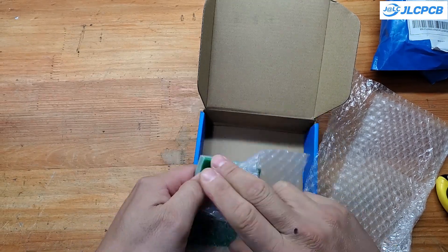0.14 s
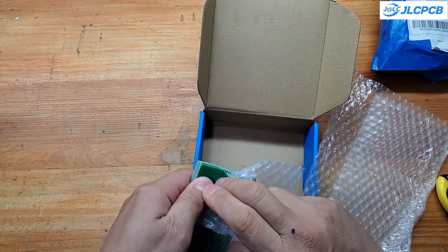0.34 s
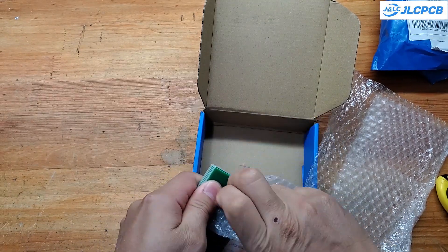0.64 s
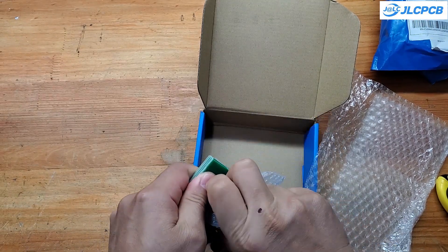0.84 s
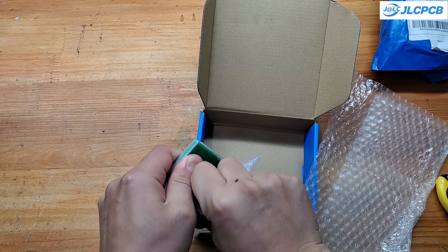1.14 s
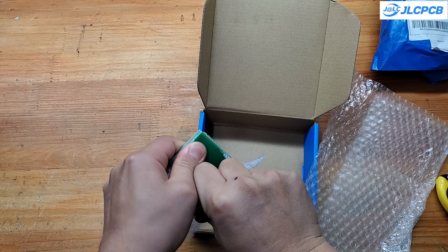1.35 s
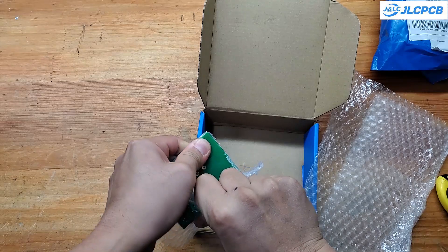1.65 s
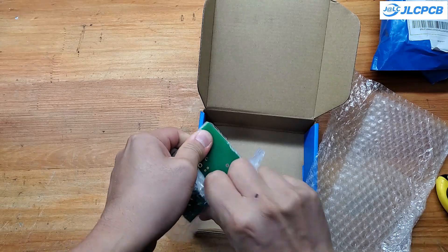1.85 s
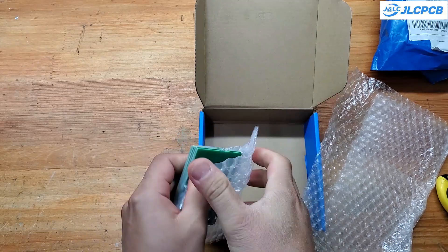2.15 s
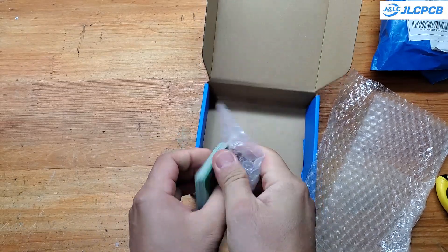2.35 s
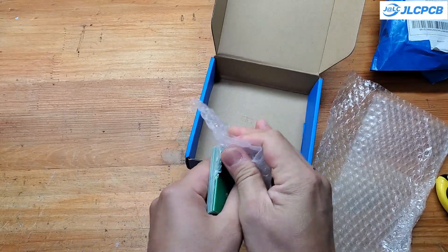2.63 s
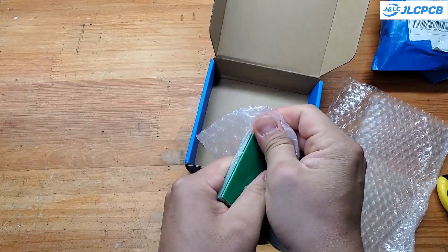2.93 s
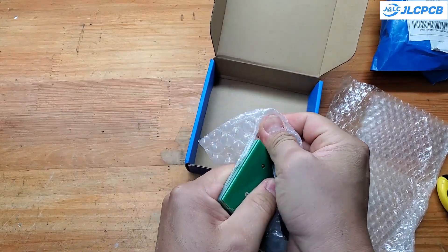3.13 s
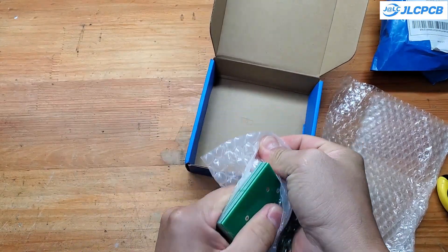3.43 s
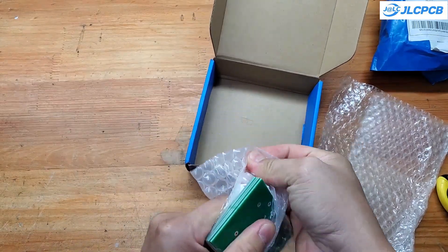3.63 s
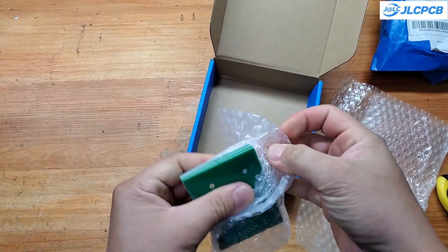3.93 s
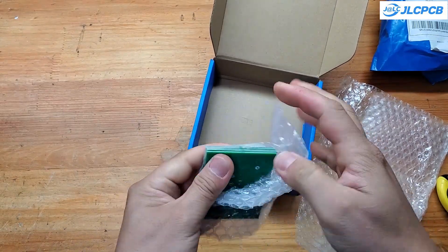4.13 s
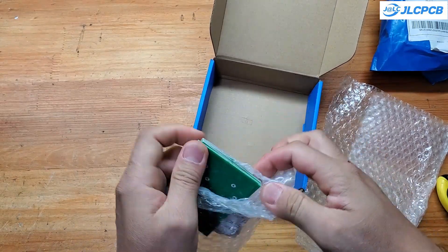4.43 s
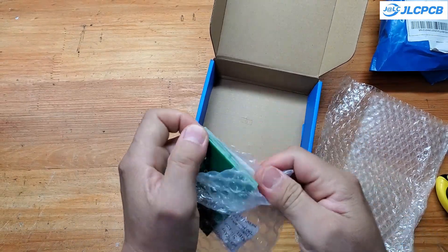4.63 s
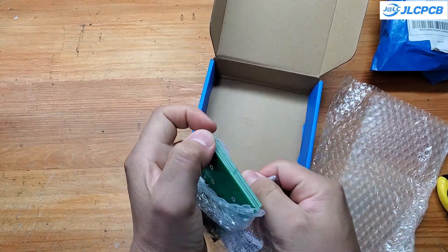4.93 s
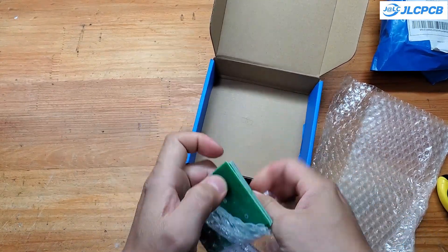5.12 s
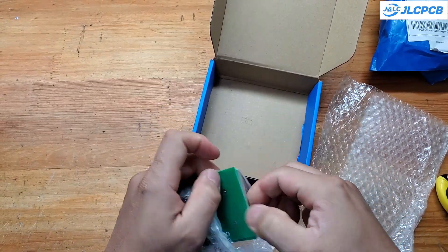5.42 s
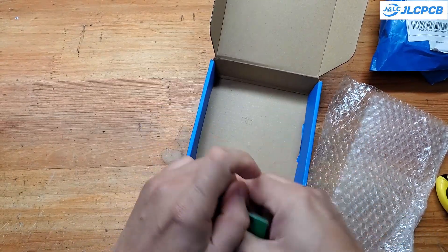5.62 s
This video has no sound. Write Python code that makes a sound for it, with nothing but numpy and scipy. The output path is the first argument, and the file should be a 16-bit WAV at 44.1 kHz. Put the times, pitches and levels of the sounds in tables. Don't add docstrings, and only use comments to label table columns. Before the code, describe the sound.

Hands unwrap bubble film from small boards, heard closely in stereo from above a table in a small, fairly dry room. A brief crinkle opens, then light ticks and sparse crackle until two hard, low-pitched snaps with dull knocks at about 0.87 and 1.05 s. Softer rustling follows, with tiny rough squeaks around 1.7 s and a crunchy jerk at 1.9 s. From 2 to 2.7 s the box is shoved, giving lumpy low rumble and dry cardboard scrape, strongest near 2.45. Bright snaps cluster from 2.7 to 3.1 s, then thinner crackle, and a sharp burst at 3.8 s. A hollow pop sounds at 4.1 s. Fine, uneven crinkling continues through 5.4 s, ending in a dense crunch with thuds near 5.65 s and a low rumble. Very faint dove coos at 0.45 and 3.5-3.9 s sit over low hum and distant engine drone.

```python
import sys
import numpy as np
from scipy import signal
from scipy.fft import rfft, irfft
from scipy.io import wavfile
from scipy.ndimage import uniform_filter1d

SR = 44100
rng = np.random.default_rng(int(sys.argv[2]) if len(sys.argv) > 2 else 0)


def bounce(signal):
    frames = np.transpose(np.atleast_2d(signal))
    limited = np.clip(frames, -1, 1)
    pcm = np.round(limited * 32767).astype(np.int16)
    wavfile.write(sys.argv[1], SR, pcm)


def invert_db(level):
    return 10 ** (np.asarray(level, dtype=float) / 20)


N = 254456

# (frequency [Hz], t60 [s])
NEAR_T60 = [(250, 0.055), (1200, 0.026), (4000, 0.042), (12000, 0.022)]
# (frequency [Hz], t60 [s])
ROOM_T60 = [(250, 0.29), (1200, 0.29), (4000, 0.25), (12000, 0.16)]
NEAR_DB, ROOM_DB = -6, -11.5


def crinkle():
    # (frequency [Hz], level [dB per Hz])
    film_colour = [(290, -55), (500, -19.5), (775, -17.5), (847, -21.5), (1430, -20), (2540, -8.5),
                   (3350, -3.5), (5670, -4.5), (7710, -17.5), (9740, -10), (15300, -15), (16500, -27)]
    # (peak time [s], length [s], crinkle [dB], dull creases [dB re crinkle], fine fizz [dB re crinkle])
    jerks = [(0.0, 0.16, -43, 4, -8.5), (0.235, 0.14, -53, 0, -11), (0.31, 0.26, -63, -17, -5),
             (0.47, 0.24, -55, 5, -13.5), (0.62, 1, -55.5, -8, -16.5), (1.05, 0.46, -47, 3, -9),
             (1.44, 0.18, -57.5, 1, -6.5), (1.58, 0.28, -52.5, 1, -0.5), (1.93, 0.22, -37, 5, -7.5),
             (2.44, 0.29, -45.5, 9, -8), (2.73, 0.34, -45, -20, -24), (2.81, 0.5, -41.5, -0.5, -9.5),
             (3.1, 0.16, -47.5, 5.5, -7.5), (3.4, 1, -55, 0, -10), (4.49, 0.19, -50.5, -1.5, -9),
             (4.62, 0.42, -52.5, 0, -10), (5.45, 0.33, -65, 5, -6), (5.548, 0.13, -53.5, 9.5, -5),
             (5.638, 0.16, -40.5, 7.5, -9), (5.678, 0.1, -36, 8, -11.5)]
    # (peak time [s], length [s], crinkle [dB], dull creases [dB re crinkle], fine fizz [dB re crinkle])
    pulls = [(0.77, 0.83, -60, 4, -18), (0.87, 0.25, -41.5, 0.5, -10), (1.72, 0.61, -52.5, 6, -12),
             (2.19, 0.22, -48, 7.5, -10), (2.34, 0.46, -48, 5, -9.5), (2.97, 0.17, -43.5, -0.5, -5.5),
             (3.33, 0.31, -47, 0, -12), (3.73, 0.38, -53.5, -10, -7.5), (3.82, 0.14, -34.5, 0, -7.5),
             (3.97, 0.61, -58.5, -6, -6.5), (4.08, 0.15, -47, -6, -8), (4.18, 0.21, -46, -2, -7),
             (4.39, 0.41, -52, 1, -9), (4.92, 0.42, -52.5, -2.5, -10), (5.19, 0.32, -52, 4, -6.5),
             (5.27, 0.19, -48, -2, -7), (5.39, 0.18, -56, 3.5, -9)]

    film = space(coloured(buckling_film() * invert_db([[1.2], [-1.2]]), film_colour))
    film = levelled(film, size=2500)
    quiet = hush()
    folds = levelled(band(film, 653, 1822), size=900) * quiet
    film = film * quiet

    crisp, dull, fine = np.sqrt(effort(jerks, rise=0.32) + effort(pulls, rise=0.68))
    lift, dull_lift = flurries()
    body = crisp * lift * invert_db(3.5) * evened(band(film, 2660, 6780))
    creases = dull * dull_lift * invert_db(-6.5) * folds
    fizz = fine * lift * invert_db(7.0) * evened(band(film, 7950, 22000))
    return body + creases + fizz


def buckling_film():
    buckles_per_s, spread_db, clump_db, patches = 2000, 4.2, 3, 24
    clump = evened(uniform_filter1d(uniform_filter1d(rng.standard_normal(N), 500), 300))
    strikes = rng.random(N) < buckles_per_s / SR * invert_db(clump_db * clump)
    strength = invert_db(spread_db * np.minimum(rng.exponential(1, N), 3))
    size = strikes * strength * rng.choice([-1, 1], N)
    patch = rng.integers(0, patches, N)
    t = np.arange(300) / SR
    film = np.zeros((2, N))
    for k, hz in enumerate(np.geomspace(900, 13000, patches)):
        rasp = rng.standard_normal(len(t)) * np.exp(-t / 0.00058)
        grain = evened(ring(hz, 3.4, t)) + 1.76 * evened(rasp)
        even = np.sign(size) * abs(size) ** min(hz / 3500, 1)
        one = signal.oaconvolve(even * (patch == k), grain)[:N]
        film += [one, np.roll(one, rng.integers(-4, 7))]
    return film


def flurries():
    # (time [s], length [s], crinkle lift [dB], dull creases lift [dB])
    bursts = [(0.075, 0.013, 12, 12), (0.233, 0.071, 0, 9), (0.451, 0.021, 11, -1), (0.555, 0.028, 19, 25),
              (0.613, 0.02, -3, 13), (0.837, 0.029, -5, 10), (0.863, 0.048, 12, 10), (1.048, 0.045, 25, 18),
              (1.245, 0.023, 20, 8), (1.338, 0.031, 21, 8), (1.426, 0.018, 15, 8.5), (1.526, 0.013, 11, 14),
              (1.759, 0.022, 13, 8), (1.823, 0.02, 13, 11), (1.878, 0.055, 11, 13), (2.054, 0.039, -3, 27),
              (2.114, 0.024, 15, 15), (2.182, 0.043, 8, -3), (2.27, 0.06, 1.5, 5.0), (2.413, 0.024, 20, 23),
              (2.607, 0.04, 6.5, -7), (2.71, 0.02, 34, 12.0), (2.785, 0.019, 8, 10), (2.984, 0.04, 8.5, 8),
              (3.076, 0.048, 9, 14), (3.198, 0.013, 18, 12), (3.319, 0.01, 26, 11), (3.537, 0.018, 7, 17),
              (3.58, 0.014, -7, 13), (3.639, 0.021, 13, 24), (3.695, 0.018, 8, 7.5),
              (3.818, 0.033, -11, 17), (4.002, 0.02, 13, 6.0), (4.097, 0.024, 9, 14),
              (4.151, 0.052, 8, 8.5), (4.341, 0.016, 10, 17), (4.404, 0.019, 10, 30), (4.496, 0.033, 3, -6),
              (4.622, 0.043, 10, -3), (4.77, 0.029, 0, 1), (4.927, 0.058, 2, 23), (4.983, 0.046, 7, 21),
              (5.077, 0.023, 5.0, 3), (5.11, 0.013, 8, 8), (5.195, 0.04, 8, 18), (5.27, 0.07, -3, 2),
              (5.38, 0.052, 5, 19), (5.56, 0.042, -3, 20), (5.637, 0.012, 15, 22), (5.67, 0.02, 20, 17)]
    share = 0.43
    t = np.arange(0, N + 64, 64) / SR
    lift_db = 0
    for s, length_s, *db in bursts:
        shape = np.exp(-(2 * (t - s) / max(length_s, .005)) ** 2)
        lift_db = lift_db + np.array(db)[:, None] * shape
    return np.repeat(invert_db(share * lift_db), 64, axis=1)[:, :N]


def hush():
    tension = np.zeros(N)
    for s, db, *_ in every_snap():
        build_up = np.linspace(0, max(db + 33, 0), round(0.02 * SR))
        add(tension, max(round((s - .022) * SR), 0), build_up)
    return invert_db(-.45 * tension)


def snaps():
    out = np.zeros((2, N))
    t = np.arange(2200) / SR
    rows = every_snap()
    chance = rng.random((len(rows), 3))
    noises = rng.standard_normal((len(rows), 3, len(t)))
    draws = rng.random((len(rows), len(t)))
    grit = peaked(band(1. * (t == 0), 2010, 5850))
    for (s, db, hz, tick_db, tear_ms), (a, b, c), noise, u in zip(rows, chance, noises, draws):
        crack = peaked(band(np.exp(-t / .00003), 0.5 * hz, min(1.68 * hz, 8000)))
        spray = (t == 0) + 0.46 * noise[:2] * np.exp(-t / 0.00017)
        tick = peaked(band(spray, 7000, 20400))
        buckle = 1.16 * ring(hz, 1.01 + .5 * a, t) + 0.55 * crack + 0.021 * grit
        buckle = buckle + invert_db(tick_db + 5.5) * tick

        fade = np.exp(-1000 * t / np.clip(tear_ms, .3, 30))
        slips = np.clip(noise[2], -1.6, 1.6) * (u < 2000 / SR) * fade
        slip = (0.059 * crack + grit + invert_db(tick_db + 13.0) * tick)[:, :200]
        tear = signal.oaconvolve(slips[None], slip)[:, :len(t)]
        sound = invert_db(db + 5.5) * (buckle + 0.37 * tear)
        place(out, s + 0.001137, sound, pan_db=1.7 + 3.0 * b, lead=round(3 * c))
    return out


def every_snap():
    # (time [s], peak level [dB], ring [Hz], bright tick [dB re peak], tear length [ms])
    cracks = [(0.839, -27.5, 2640, -29, 3.9), (0.87, -14, 1405, -12, 5.5), (1.0451, -11.5, 1350, -7, 5.8),
              (1.9004, -28, 4330, -2, 5.3), (1.929, -25.5, 4600, -16, 3.5), (2.39, -24.5, 3620, -26, 4.2),
              (2.7044, -18, 4030, -19, 4.5), (2.8828, -24.5, 3600, -7, 5.9), (3.0792, -17, 3190, -42, 1.9),
              (3.1123, -30, 1780, -20, 3.1), (3.319, -28.5, 1730, -4, 6), (3.5787, -29.5, 5200, -23, 1.1),
              (3.687, -24.5, 5500, -15, 3.7), (3.8011, -17.5, 2800, -16, 3.9), (3.821, -15, 6000, -9, 0.64),
              (3.8347, -15, 6200, 0.5, 0.72), (3.9927, -34, 4300, 0, 0.51), (4.151, -24.5, 3180, -12, 4),
              (4.8945, -25, 4630, -9.5, 2.2), (5.5543, -24.5, 1980, -17, 2.5),
              (5.6261, -30.5, 1710, -7, 3.8), (5.6345, -25.5, 1160, -17, 10), (5.67, -18.5, 3800, -5.5, 9),
              (5.6777, -19, 3000, -12, 3.4)]
    # (time [s], peak level [dB], ring [Hz], bright tick [dB re peak])
    crisp = [(0.4431, -41, 3660, 3.5), (0.5012, -36.5, 3200, -3), (0.5567, -38, 1820, -0.5),
             (0.909, -27.5, 4940, -8), (0.9249, -30.5, 3480, 1.5), (1.143, -34.5, 2940, -2),
             (1.2345, -35, 3880, -7), (1.423, -41, 2220, 1.5), (1.5214, -42, 3200, -5),
             (2.0244, -38, 1040, -8), (2.7594, -33, 3480, -3), (2.8864, -25.5, 3600, 5),
             (3.2853, -37, 2770, -9), (3.454, -32, 5800, -7.5), (3.633, -32, 4660, -15),
             (3.76, -40, 1860, 1), (3.9675, -41, 4700, 1), (3.93, -39.5, 3030, -2),
             (4.003, -25.5, 5900, -8), (4.055, -35, 3370, -2), (4.3038, -39.5, 3360, -11),
             (4.335, -38, 5690, -6), (4.3555, -35.5, 2470, -9), (4.4867, -41, 2470, -1),
             (4.5985, -41.5, 3860, -1), (4.659, -30.5, 5560, -11.5), (4.7617, -36.5, 4530, -8.5),
             (4.8295, -40.5, 5100, -2), (4.976, -38.5, 2940, -6), (5.1054, -29, 5500, -6)]
    # (time [s], peak level [dB], ring [Hz])
    muffled = [(0.0717, -35.5, 2720), (0.5438, -34.5, 3900), (0.8103, -39, 2260), (1.025, -32.5, 1220),
               (1.2037, -36.5, 3740), (1.683, -34, 3640), (1.8107, -37, 4400), (1.869, -35, 3430),
               (2.1085, -37.5, 1370), (2.172, -32.5, 4430), (2.253, -40, 3660), (2.28, -32.5, 3800),
               (2.554, -38.5, 2150), (2.592, -37.5, 2920), (2.743, -32, 2820), (2.9482, -36, 3940),
               (3.19, -30, 3180), (3.237, -40, 1500), (3.251, -34.5, 4300), (3.358, -26.5, 5300),
               (3.401, -33, 3520), (3.738, -40, 2960), (4.3971, -28, 5140), (4.932, -34.5, 1980),
               (4.135, -36.5, 5800), (5.1674, -36, 2180), (5.195, -33, 2230), (5.2457, -33, 5330),
               (5.5303, -36.5, 1390), (5.5419, -29.5, 1610)]
    # (time [s], peak level [dB], ring [Hz], bright tick [dB re peak])
    faint = [(0.2184, -41, 3420, -10), (0.3185, -38, 4000, 6), (0.41, -35.5, 3360, -4),
             (0.4618, -31.5, 3260, -2), (0.4898, -42, 3420, -8), (0.6115, -45, 3240, -8),
             (0.657, -39, 5290, -5), (0.6707, -30, 3260, -8), (0.7335, -30, 3250, -5),
             (0.7868, -32.5, 2290, 2), (1.0141, -41, 1140, 5), (1.408, -45, 2130, 3),
             (1.4513, -34.5, 3200, -6), (1.559, -30, 6450, 5), (1.5753, -43, 3180, -3),
             (1.604, -30, 4200, -8), (2.188, -30, 3400, -12), (2.2004, -24, 5040, -12),
             (2.322, -33, 2730, 1), (2.353, -35, 3920, -10), (2.4448, -36, 2780, -8),
             (2.5444, -38, 1890, -4), (2.6162, -32.5, 2670, -3), (2.6471, -35, 2790, -2),
             (2.7778, -19, 3420, -12), (2.869, -24, 3350, 5), (2.8939, -29, 3440, -6),
             (2.923, -19.5, 4660, -6), (2.9667, -25, 4270, -8), (3.0205, -37, 2120, -12),
             (3.1282, -25, 4890, -6.5), (3.2191, -32, 3420, -8), (3.2993, -30.5, 1720, -10),
             (3.3862, -38, 3020, -11), (3.486, -36, 3270, -3), (3.5342, -35, 3160, -8),
             (3.6939, -21.5, 3770, -7), (3.9125, -32.5, 3050, 4), (4.1127, -42.5, 3203, -1),
             (4.4682, -32, 3150, -20), (4.5817, -30, 6060, -7), (4.7393, -31, 4330, -5),
             (4.787, -38, 4750, -11), (4.8668, -33, 4420, -6), (5.002, -32, 3580, -8),
             (5.0786, -36, 1960, -14), (5.447, -52, 2140, -3)]
    crisp_tear_ms, muffled_tear_ms, faint_tear_ms = 2.6, 5.6, 1.3
    muffled_tick_db, faint_db = -27, -8
    return (list(cracks)
            + [(*row, crisp_tear_ms) for row in crisp]
            + [(*row, muffled_tick_db, muffled_tear_ms) for row in muffled]
            + [(s, db + faint_db, hz, tick_db, faint_tear_ms) for s, db, hz, tick_db in faint])


def squeaks():
    # (time [s], pitch [Hz], level [dB])
    whistles = [
        [(1.635, 720, -63), (1.655, 997, -56), (1.685, 1084, -48)],
        [(1.685, 1150, -44), (1.705, 1600, -64), (1.735, 1745, -71)],
        [(1.7, 773, -63), (1.737, 870, -57), (1.78, 780, -71)],
        [(1.735, 1102, -60), (1.75, 1507, -61), (1.775, 1255, -55)],
    ]
    return glides(whistles, waver=0.0584) * invert_db([[1.5], [-1.5]])


def knocks():
    # (time [s], peak level [dB], pitch [Hz], decay [cycles])
    dull_knocks = [(0.873, -23.5, 352, 0.54), (1.043, -26, 393, 0.75), (1.954, -33, 366, 1.1),
                   (2.413, -37.5, 228, 2), (2.922, -45, 231, 2.6), (3.82, -52.5, 195, 1.6),
                   (4.077, -47.5, 440, 1.6), (4.333, -48.5, 462, 1.5), (4.395, -42, 403, 1.16),
                   (4.915, -52, 368, 1.4), (5.194, -32, 396, 0.35), (5.252, -35.5, 620, 0.51),
                   (5.554, -31, 446, 0.79), (5.624, -27.5, 370, 0.83), (5.677, -20.5, 285, 0.41)]
    # (time [s], peak level [dB], pitch [Hz], decay [cycles])
    pockets = [
        (1.506, -50, 755, 3.6),
        (3.4, -30.5, 1000, 1.03),
        (2.1, -33, 950, 2),
        (4.1, -19, 1200, 2.3),
        (2, -31.5, 1240, 1.9),
        (4.1, -44, 1340, 2.5),
        (0.95, -43, 1000, 2.2),
    ]
    out = np.zeros((2, N))
    t = np.arange(2200) / SR
    for s, db, hz, cycles in list(dull_knocks) + list(pockets):
        sound = invert_db(db + 6.5) * ring(hz, np.clip(cycles, .5, 9), t)
        place(out, s + 0.0012, sound, pan_db=4.0, lead=3)
    return out


def swells():
    # (peak time [s], level [dB], pitch [Hz], length [s])
    bows = [(2.048, -36, 246, 0.01), (2.121, -48, 250, 0.016), (5.387, -36.5, 790, 0.0039),
            (5.388, -45, 520, 0.0033), (2.282, -42.5, 101.5, 0.039), (2.359, -45, 82.6, 0.018),
            (2.445, -36, 108, .025), (2.49, -33.5, 99, .025), (2.53, -35, 85, 0.014),
            (2.565, -40, 112, 0.022), (2.639, -47.5, 104.6, 0.044), (2.928, -43, 102.7, .04)]
    out = np.zeros((2, N))
    t = np.arange(-4000, 4000) / SR
    for s, db, hz, length_s in bows:
        sound = invert_db(db) * np.sin(2 * np.pi * hz * t) * np.exp(-(t / length_s) ** 2)
        place(out, s + t[0], sound, pan_db=-0.7, lead=3)
    return out + invert_db(NEAR_DB) * tail(out, NEAR_T60, 0.00213, size=2000)


def box():
    # (frequency [Hz], level [dB per Hz])
    box_colour = [(15, -26), (25, -52), (43, 10.5), (102, 4), (162, -8.5), (243, -6.5), (291, -17),
                  (354, -19.5), (401, -14.5), (700, -11.5), (910, -74), (1540, -120)]
    # (peak time [s], length [s], rumble [dB], cardboard scrape [dB re rumble])
    shoves = [(0.0, 0.16, -53, -2), (0.9, 1.4, -61.5, -1.5), (2.08, 0.71, -48.5, 0.5),
              (2.3, 0.49, -47.5, -3.5), (2.435, 0.11, -35.5, -0.5), (2.5, 0.18, -39.5, -4.5),
              (2.56, 0.066, -43.5, -6.5), (2.64, 0.15, -54, -28), (2.94, 0.48, -47, -13),
              (3.58, 0.3, -64, -3), (3.8, 1.1, -62, -7), (5.24, 1, -64, -0.5), (5.77, 1.2, -46.5, -16.5)]
    # (frequency [Hz], width [Hz], level [dB])
    lid = [(242, 61, 0), (366.4, 55, -4), (600, 45, -10), (816, 61, -5)]
    rest_db = np.array([[-58.5], [-66]])

    shoved = effort(shoves, rise=0.34)
    rumble, scrape = np.sqrt(shoved + invert_db(rest_db) ** 2)
    lumps = invert_db(2.4 * evened(uniform_filter1d(rng.standard_normal(N), 900)))
    white = port_noise() * lumps
    noise = coloured(white, box_colour)
    panels = sum(invert_db(db) * evened(band(white, hz - width / 2, hz + width / 2)) for hz, width, db in lid)
    low = rumble * levelled(band(noise, 51.0, 155), size=5000)
    low = low + scrape * invert_db(-1.5) * evened(band(noise, 165, 515))
    low = low + np.sqrt(shoved[1]) * invert_db(-5.0) * panels
    return low * invert_db([[.4], [-.4]])


def dove():
    # (time [s], pitch [Hz], level [dB])
    coos = [
        [(0.41, 554.6, -73), (0.462, 549.1, -63), (0.54, 520, -72)],
        [(3.52, 546, -64), (3.585, 551.0, -59.5), (3.65, 505, -66)],
        [(3.735, 547.2, -59), (3.80, 553.0, -48.5), (3.875, 495, -70)],
    ]
    out = glides(coos, waver=0.02)
    return out + invert_db(-4.5) * tail(out[None], ROOM_T60, 0.0111, size=14000)


def hum():
    # (frequency [Hz], level [dB per Hz])
    hum_colour = [(21, -41), (35, 7), (93, -2), (305, -44), (338, -40), (595, -46), (677, -28), (3340, -37),
                  (5450, -42), (7430, -39), (14100, -28), (16500, -57)]
    # (time [s], pitch [Hz], level [dB])
    drones = [
        [(0.9, 152, -58), (1.152, 150.7, -58), (1.45, 150, -70)],
        [(4.88, 139.2, -59.5), (4.994, 149, -59), (5.2, 139, -65.5)],
    ]
    hum_db = -62
    return invert_db(hum_db) * evened(coloured(port_noise(), hum_colour)) + glides(drones, waver=0.016)


def effort(rows, rise):
    fade_db, bend = 23.5, 1.123
    t = np.arange(0, N + 64, 64) / SR
    power = 0
    for s, length_s, db, *rel_db in rows:
        away = np.where(t < s, (s - t) / rise, (t - s) / (1 - rise)) / length_s
        layer_db = db + np.array([0, *rel_db])[:, None]
        power = power + invert_db(layer_db - fade_db * away ** bend) ** 2
    return np.repeat(power, 64, axis=1)[:, :N]


def ring(hz, cycles, t):
    return np.sin(2 * np.pi * hz * t) * np.exp(-t * hz / cycles) * (1 - np.exp(-t * hz * 3.02))


def glides(tables, waver):
    out = np.zeros(N)
    shake = 1 + waver * evened(uniform_filter1d(rng.standard_normal(N), 90))
    for rows in tables:
        hz, db = curves(rows)
        start_s, end_s = rows[0][0], rows[-1][0]
        t = (np.arange(N) / SR - start_s) / (end_s - start_s)
        fade = np.sqrt(np.clip(8 * t * (1 - t), 0, 1))
        out += invert_db(db) * np.sin(2 * np.pi * np.cumsum(hz * shake) / SR) * fade
    return out


def space(x):
    near = tail(x, NEAR_T60, 0.001185, size=4000)
    room = tail(x - 0.36 * band(x, 510, 2070), ROOM_T60, .006, size=14000)
    return x + invert_db(NEAR_DB) * near + invert_db(ROOM_DB) * room


def tail(x, t60s, gap_s, size):
    out = np.zeros((2, N))
    turn = np.arange(N) / SR * 9.
    for k in range(3):
        taps = np.zeros((2, size))
        at = np.arange(0, size - 12, 12) + rng.integers(0, 12, (2, (size - 1) // 12))
        np.put_along_axis(taps, at, rng.choice([-1., 1.], at.shape), 1)
        hz, t, z = signal.stft(taps, SR, nperseg=128)
        decay = invert_db(-60 * t / read(t60s, hz)[:, None])
        taps = signal.istft(z * decay, SR, nperseg=128)[1]
        taps = alike(taps) / np.linalg.norm(taps[0])
        taps = np.pad(taps, ((0, 0), (round(gap_s * SR), 0)))
        share = np.sqrt(2 / 3) * np.cos(turn + k * np.pi / 3)
        out += signal.oaconvolve(x * share, taps, axes=1)[:, :N]
    return out


def alike(pair):
    # (frequency [Hz], left-right likeness [0-1])
    likeness = [(60, 0.98), (180, 0.85), (550, 0.44), (1650, 0.12), (4970, 0.091), (15000, 0.0725)]
    a, b = rfft(pair)
    same = np.clip(read(likeness, np.fft.rfftfreq(pair.shape[1], 1 / SR)), 0, 1)
    return irfft(np.array([a, same * a + np.sqrt(1 - same ** 2) * b]), pair.shape[1])


def port_noise():
    return alike(rng.standard_normal((2, N)))


def place(out, s, sound, pan_db, lead):
    left, right = sound * np.ones((2, 1))
    add(out[0], round(s * SR), invert_db(pan_db / 2) * left)
    add(out[1], round(s * SR) + lead, invert_db(-pan_db / 2) * right)


def add(mix, at, sound):
    part = mix[at:][:len(sound)]
    part += sound[:len(part)]


def band(x, lo_hz, hi_hz):
    return signal.sosfilt(signal.butter(3, [lo_hz, hi_hz], "bandpass", fs=SR, output="sos"), x)


def coloured(x, points):
    gain_db = np.maximum(read(points, abs(np.fft.fftfreq(8192, 1 / SR))), -100)
    log_gain = np.log(invert_db(gain_db))
    taps = np.fft.ifft(np.exp(log_gain - 1j * signal.hilbert(log_gain).imag)).real[:4096]
    return signal.oaconvolve(x, taps[None], axes=1)[:, :N]


def levelled(x, size):
    return x / np.sqrt(uniform_filter1d((x ** 2).mean(0), size) + 1e-12)


def evened(x):
    return x / np.sqrt(np.mean(x ** 2) + 1e-20)


def peaked(x):
    return x / abs(x).max()


def read(points, hz):
    f, value = np.transpose(points)
    return np.interp(np.log(hz + 1), np.log(f + 1), value)


def curves(rows):
    s, *columns = np.transpose(rows)
    return [np.interp(np.arange(N) / SR, s, c) for c in columns]


def scene():
    return space(snaps() + knocks() + squeaks()) + swells() + crinkle() + box() + dove() + hum()


def band_limit(x):
    return signal.sosfilt(signal.butter(12, 16970, fs=SR, output="sos"), x)


def record(dry):
    edge_hz = 16000
    corners_hz = [0, edge_hz - 150, edge_hz + 50, edge_hz + 800, edge_hz + 1000, SR / 2]
    edge = signal.firwin2(511, corners_hz, [1, 1, .05, .05, 0, 0], fs=SR)
    held = .9 * np.tanh(dry / .9)
    return band_limit(signal.oaconvolve(held, edge[None], "same"))


dry = scene()
out = record(dry)
bounce(out)
```